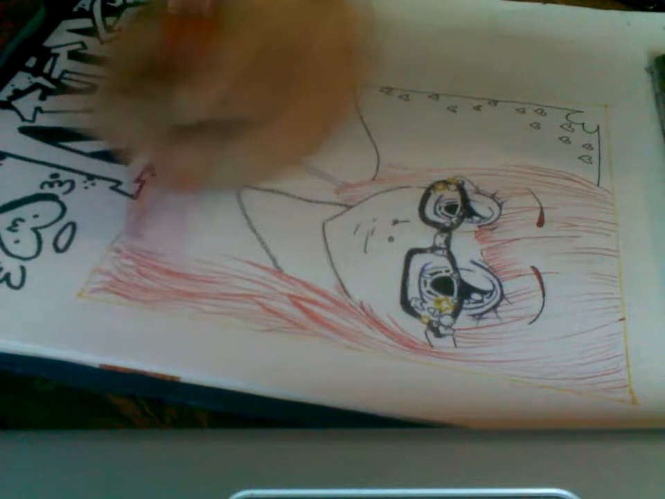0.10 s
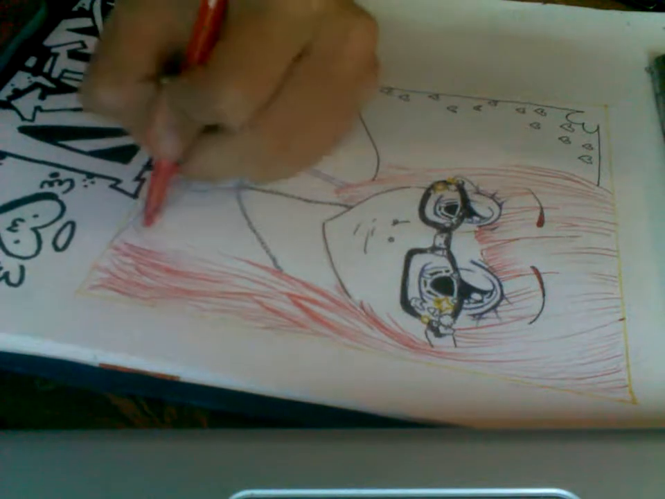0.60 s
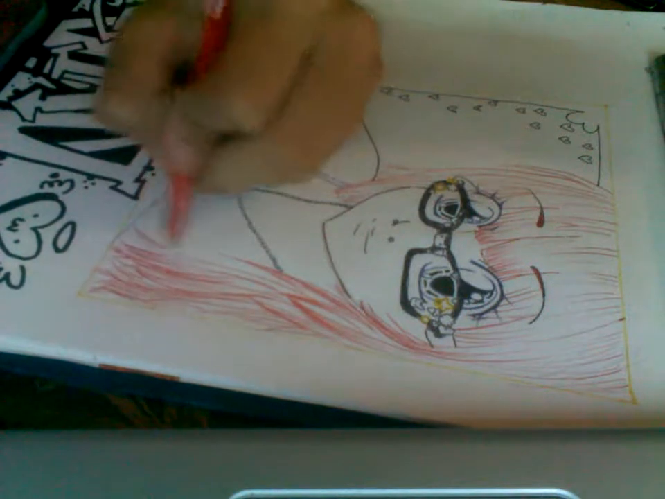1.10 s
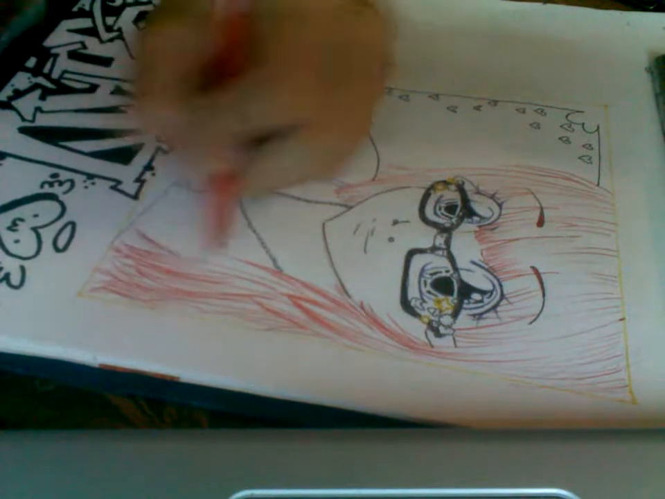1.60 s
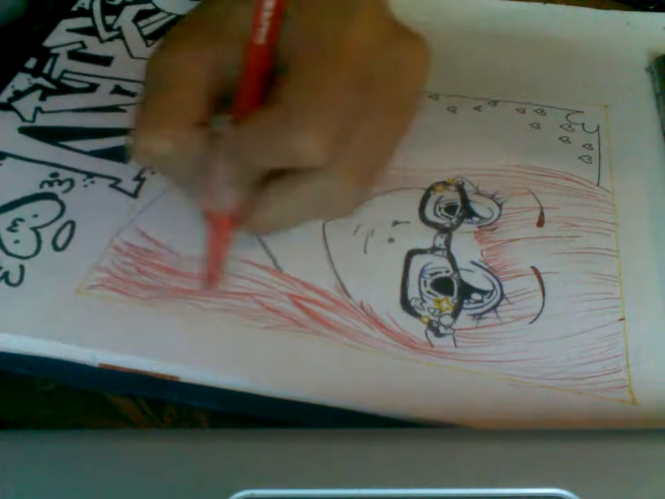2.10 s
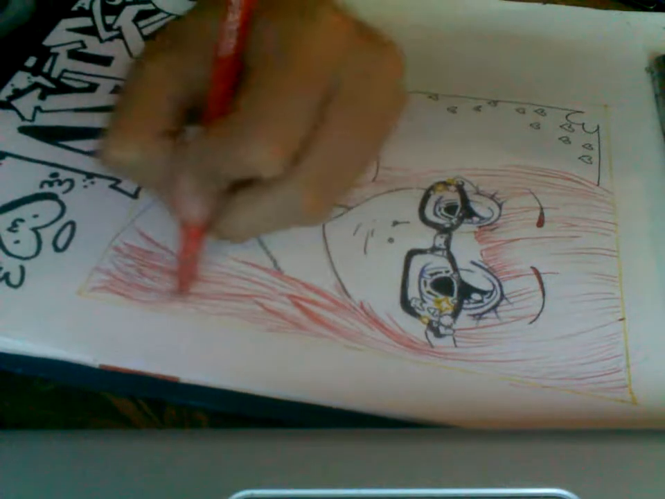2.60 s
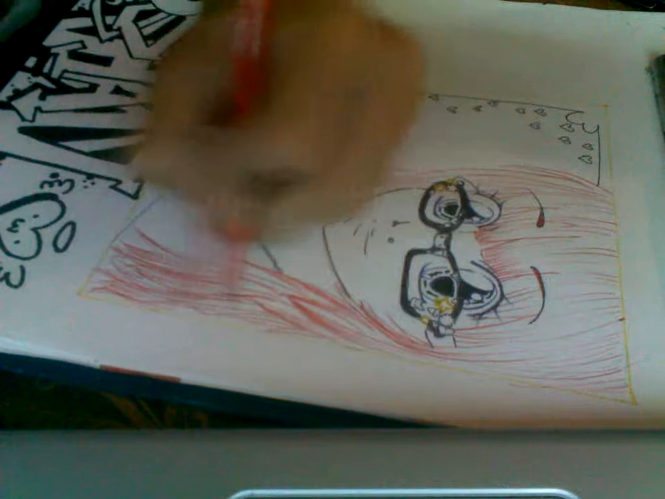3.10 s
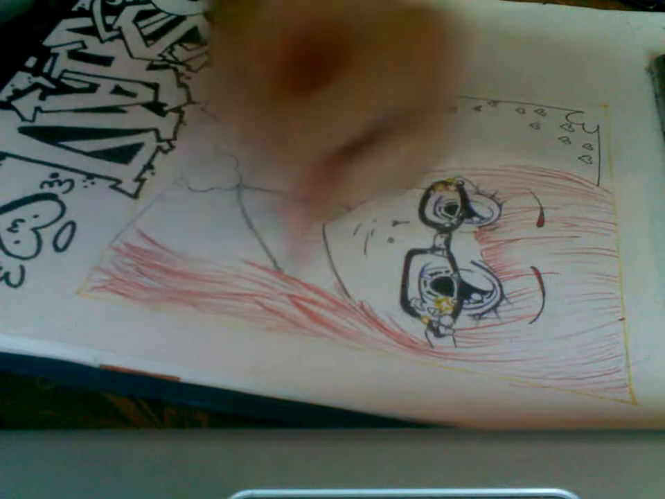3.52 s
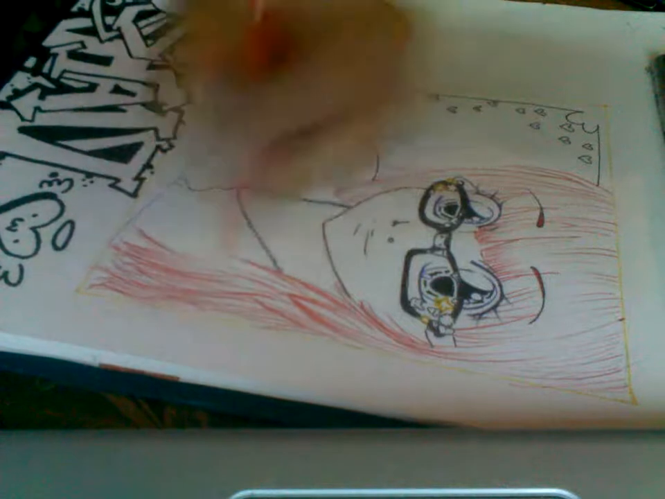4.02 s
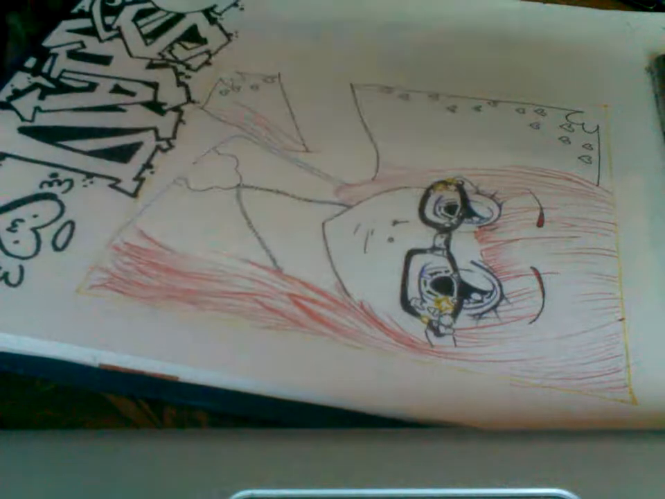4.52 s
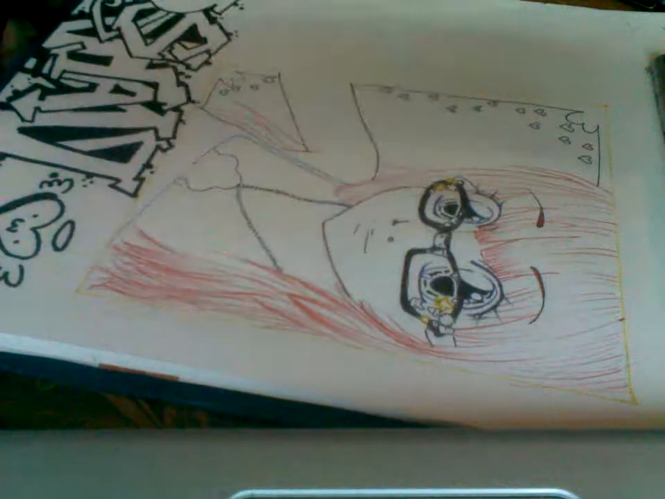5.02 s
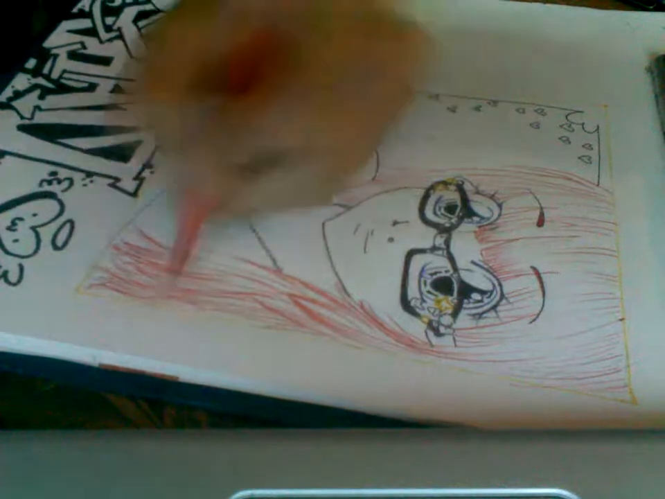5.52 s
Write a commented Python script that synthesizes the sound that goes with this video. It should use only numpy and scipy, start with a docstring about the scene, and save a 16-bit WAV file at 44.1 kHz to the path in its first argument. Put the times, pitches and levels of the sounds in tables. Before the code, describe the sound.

A low computer hum, gently throbbing a little faster than once a second, runs with dull fan air throughout. Over it a coloured pencil makes short scratchy rubs on a paper pad, first a pair, then a cluster, one sharp dry tap, faint hand drags, more strokes, then mostly hum. Close, cheap mono microphone in a quiet room, with small stuttering clicks.

```python
"""A computer's hum and broad fan noise run throughout, while a coloured pencil shades a paper pad in short strokes.
The pencil taps the pad, and the hand drags over the sheet now and then. Strokes and drags are noise shaped
by the pad's resonances and the paper; taps are fading sines with a noise snap; the hum is a set of sines.
The recorder stutters: short blocks of sound fall out of step and click at their edges."""
import sys
import numpy as np
from scipy import signal
from scipy.fft import rfft, irfft, next_fast_len
from scipy.io import wavfile
from scipy.ndimage import map_coordinates

SR = 44100
rng = np.random.default_rng(int(sys.argv[2]) if len(sys.argv) > 2 else 0)


def file_out(sig):
    """Save sig as 16-bit WAV at sys.argv[1]."""
    # one column per channel
    cols = np.atleast_2d(sig).T
    # limit, then scale
    lim = np.clip(cols, -1, 1)
    pcm = np.round(lim * 32767).astype(np.int16)
    wavfile.write(sys.argv[1], SR, pcm)


def field_ratio(decibels):
    """Amplitude ratio for a level in dB (20 dB per decade); scalars and array-likes work."""
    return 10 ** (np.asarray(decibels, dtype=float) / 20)


N = 248724
T = np.arange(N) / SR  # time in seconds
DRONE_HZ = 119.2  # pitch of the main hum
BLOCK_S = 0.01  # length of one recorder block


def unit(x):
    """Scales a sound to rms 1, so that a later gain sets its level."""
    return x / np.sqrt(np.mean(x ** 2) + 1e-20)


def wobble(rate):
    """Draws a smooth random curve through this many random points a second."""
    points = rng.standard_normal(int(N * rate / SR) + 4)
    return map_coordinates(points, [T * rate])


def filtered(x, response):
    """Multiplies the spectrum by a response, which may be complex, at each frequency."""
    size = next_fast_len(N + 8192)  # spare room so that the tail does not wrap to the start
    spectrum = rfft(x, size) * response(np.fft.rfftfreq(size, 1 / SR))
    return irfft(spectrum, size)[..., :N]


def colour(points):
    """Turns (Hz, dB) points into a gain curve, joined up along a log frequency axis."""
    point_hz, point_db = np.transpose(points)
    return lambda hz: field_ratio(np.interp(np.log(hz + 1), np.log(point_hz + 1), point_db))


def grit(spread_db, grain_hz):
    """Makes noise whose size varies at random, as from one paper fibre to the next."""
    return rng.standard_normal(N) * field_ratio(spread_db * wobble(grain_hz))


def rubbing():
    """Fibres catch the tip or hand: the pad's modes speak, and the paper tooth hisses above them."""
    # Pencil strokes. Each row: start in seconds, end in seconds, pad body level in dB,
    # share of the brighter middle mode from 0 to 1, paper hiss level in dB.
    stroke_rows = [(0.032, 0.089, -32, 0.8, -44), (0.057, 0.124, -26.5, 0.23, -41),
                   (0.577, 0.651, -35.5, 0.15, -44), (0.832, 0.909, -34.5, 0.45, -50),
                   (1.071, 1.14, -30.5, .65, -45), (1.251, 1.345, -30, 0.78, -45),
                   (1.344, 1.39, -36, .9, -54), (2.568, 2.66, -37.5, .6, -46), (2.69, 2.76, -41, 0.6, -44),
                   (2.79, 2.893, -37.5, .26, -44), (3.001, 3.086, -31.5, .5, -43),
                   (3.195, 3.28, -35.5, 0.45, -40.5), (3.687, 3.729, -44, .5, -35)]
    # Drags of the hand. Each row: start in seconds, end in seconds, pad body level in dB,
    # top mode level in dB, paper hiss level in dB.
    drag_rows = [(1.53, 1.715, -47, -47.5, -43), (1.72, 1.97, -44.5, -58, -61),
                 (2.043, 2.162, -45, -61, -52), (4.0, 4.782, -42.5, -49, -67)]
    # Resonances of the pad, low to high. Each row: centre in Hz, width of one filter pass in Hz.
    pad_modes = [(650, 340), (1300, 460), (1700, 420), (2500, 800)]
    # Tone of the paper hiss. Each row: frequency in Hz, relative level in dB per Hz.
    tooth_tone = [(2500, -9), (3800, 6.5), (6000, 4.5), (8000, 0.5), (11000, -4), (14000, -66)]
    low_db = -1  # the lowest mode, against the body
    top_db = -3.5  # a stroke's top mode, against the midpoint of body and hiss
    drag_bright = 0.46  # share of the brighter middle mode under the hand
    hiss_lag_s = 0.011  # the tooth hisses most late in a stroke, when the tip is fastest

    contacts = []
    for start, end, body_db, bright, hiss_db in stroke_rows:
        upper_db = (body_db + hiss_db) / 2 + top_db
        contacts.append((start, end, body_db, bright, upper_db, hiss_db))
    for start, end, body_db, upper_db, hiss_db in drag_rows:
        contacts.append((start, end, body_db, drag_bright, upper_db, hiss_db))

    levels = np.zeros((5, N))  # four pad modes, then the hiss
    for start, end, body_db, bright, upper_db, hiss_db in contacts:
        # contact builds and lets go softly; long contacts hold level between
        nearness = np.clip(np.minimum(T - start, end - T) / 0.043, 0, 1)
        touch = np.sin(np.pi / 2 * nearness) ** 1.38
        shares = np.clip([1 - bright, bright], 0, 1)  # split by power
        dull_gain, bright_gain = field_ratio(body_db) * np.sqrt(shares)
        gains = [field_ratio(body_db + low_db), dull_gain, bright_gain, field_ratio(upper_db), field_ratio(hiss_db)]
        levels += np.outer(gains, touch)
    levels[-1] = np.roll(levels[-1], round(hiss_lag_s * SR))

    voices = []
    for centre, width in pad_modes:
        def resonance(hz):
            """Passes the noise twice through one resonance of the pad."""
            return (1j * hz * width / (centre * centre - hz * hz + 1j * hz * width)) ** 2
        voices.append(filtered(grit(2.9, 300), resonance))
    voices.append(filtered(grit(2.7, 400), colour(tooth_tone)))
    return sum(gain * unit(voice) for gain, voice in zip(levels, voices))


def tap():
    """The wooden pencil rings drily over a short snap; the soft lead rounds the attack."""
    # The tip grazes, then ticks on the pad. Each row: time in seconds, level in dB.
    tick_rows = [(1.516, -27), (1.522, -11)]
    # Modes of the pencil. Each row: frequency in Hz, level against the tick in dB,
    # time to fade by 60 dB in seconds.
    pencil_modes = [(550, -2, 0.0059), (910, -1, 0.005), (1500, 0.5, 0.005), (2540, -1, .004),
                    (2900, 3.5, 0.0039), (3700, -5, 0.0061), (6200, -5, 0.0043)]
    crack_db, crack_t60_s = -3.5, 0.0055  # snap of first contact: level against the tick, 60 dB fade
    attack_s = 0.00024

    sound = np.zeros(N)
    for start, tick_db in tick_rows:
        t = np.clip(T - start, 0, None)
        ring = np.zeros(N)
        for hz, mode_db, t60_s in pencil_modes:
            ring += field_ratio(tick_db + mode_db - 60 * t / t60_s) * np.sin(2 * np.pi * hz * t)
        crack = field_ratio(tick_db + crack_db - 60 * t / crack_t60_s) * rng.standard_normal(N)
        attack = 1 - np.exp(-t / attack_s)
        sound += attack * (ring + crack)
    return sound


def hum():
    """The computer's rotors give steady tones; their clock leaps by one block wherever a block is lost."""
    # Moments at which a block is dropped and the hum jumps ahead. Each entry: time in seconds.
    lost_times = [.93, 1.27, 3.15, 5.23]
    # Throbbing of the main hum: once, twice, then three times a throb.
    # Each row: depth in dB, time of a crest in seconds.
    throb_rows = [(1.46, 0.77), (1.5, .794), (0.77, .856)]
    # Other rotor tones. Each row: frequency in Hz, rms level in dB, size of the random wander in dB.
    rotor_rows = [(13.9, -34.5, 6), (29.25, -39, 2), (81.9, -34, -1), (90.5, -35.5, 2), (147.5, -43, 4.5),
                  (168, -38.5, 1), (203.3, -43.5, 2), (321.2, -44, 0.5), (357, -50, 1), (1065, -53, 0.5)]
    drone_db, throb_s = -20.5, 0.832  # main hum: middle level in dB, seconds in one throb
    overtone_db, overtone_grows = -39.5, 1.37  # the octave: level in dB, throb depth as a multiple
    whine_hz, whine_db = 7778, -67.5

    clock = T + BLOCK_S * np.searchsorted(lost_times, T)

    def tone(hz):
        """Makes a sine of rms 1 on the leaping clock, from a random phase."""
        return np.sqrt(2) * np.sin(2 * np.pi * (hz * clock + rng.random()))

    throb_db = np.zeros(N)
    for k, (depth_db, crest) in enumerate(throb_rows):
        throb_db += depth_db * np.cos(2 * np.pi * (k + 1) * (T - crest) / throb_s)

    sound = field_ratio(drone_db + throb_db + 0.76 * wobble(3.8)) * tone(DRONE_HZ)
    octave_db = overtone_db + overtone_grows * throb_db + 1.4 * wobble(3)
    sound += field_ratio(octave_db) * tone(2 * DRONE_HZ)
    for hz, rotor_db, wander_db in rotor_rows:
        sound += field_ratio(rotor_db + wander_db * wobble(2.49)) * tone(hz)
    sound += field_ratio(whine_db + 3 * wobble(3)) * tone(whine_hz)  # a thin electric whine

    # the hum dips to silence for a moment at each lost block, to cover the seam
    seam_distance = np.min(np.abs(T[:, None] - lost_times), axis=1)
    join = 1 - np.exp(-(seam_distance / 0.0024) ** 2)
    return join * sound


def air():
    """Fan air and microphone hiss are one broad, shaped noise whose level barely moves."""
    # Tone of the noise. Each row: frequency in Hz, relative level in dB per Hz.
    air_tone = [(8, -16), (25, 0), (50, -2), (110, -4), (180, -1.5), (260, -6), (420, -8.5), (470, -11),
                (750, -11), (900, -16.5), (1300, -20.5), (1750, -20.5), (2050, -24.5), (3400, -29),
                (6000, -32.5), (10500, -33)]
    air_db = -28.5  # middle rms level
    noise = filtered(rng.standard_normal(N), colour(air_tone))
    return field_ratio(air_db + 0.35 * wobble(3.15)) * unit(noise)


def scene():
    """Adds pencil, hand and computer at one microphone."""
    mix = rubbing() + tap() + hum() + air()
    return mix[None]  # one channel


def slips(x):
    """Blocks out of step push the wave toward its other side at both edges; the push fades inward."""
    # Slipped blocks. Each row: start in seconds, jump at the start in dB, jump at the end in dB.
    slip_rows = [(0.796, -10, -37), (0.9266, -26, -13), (2.3162, -17.5, -24), (2.4368, -10, -18),
                 (2.5475, -16, -14.5), (2.976, -26, -31), (3.1513, -12, -28), (3.3625, -12.5, -37),
                 (3.6044, -17, -18), (3.725, -28, -9), (3.8251, -17.5, -14), (3.9566, -16, -17),
                 (4.3088, -23, -19), (5.597, -16, -28)]
    settle_s = 0.0035  # how far into a block a leap is felt

    offset = np.zeros(N)
    t = np.arange(round(BLOCK_S * SR) + 4) / SR
    settle = np.cos(2 * np.pi * DRONE_HZ * t) * np.exp(-(t / settle_s) ** 2)
    for start, first_db, last_db in slip_rows:
        k = round(start * SR)
        edge_values = x[[k, k + len(t)]]
        first, last = -np.sign(edge_values) * field_ratio(np.array([first_db, last_db]))
        offset[k:k + len(t)] = first * settle + last * settle[::-1]
    return offset


def band_limit(x):
    """A steep low-pass at the top of the band."""
    return signal.sosfilt(signal.butter(12, 11740, fs=SR, output="sos"), x)


def record(dry):
    """The recorder adds its stutter, then cuts the treble steeply at its band edge."""
    edge_hz = 11014  # here the gain is one half
    stuttered = dry + slips(dry[0])
    finished = filtered(stuttered, lambda hz: 1 / (1 + (hz / edge_hz) ** 90))
    return band_limit(finished)


dry = scene()
out = record(dry)
file_out(out)
```